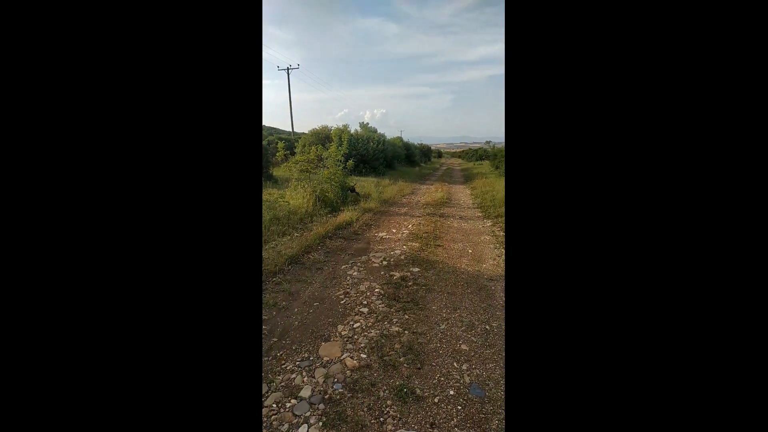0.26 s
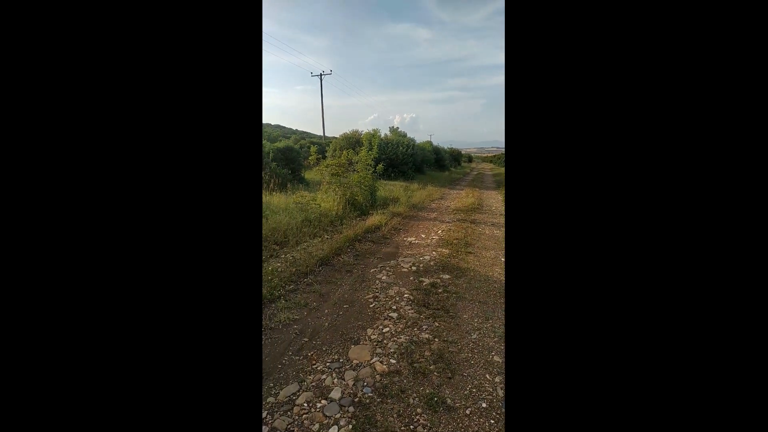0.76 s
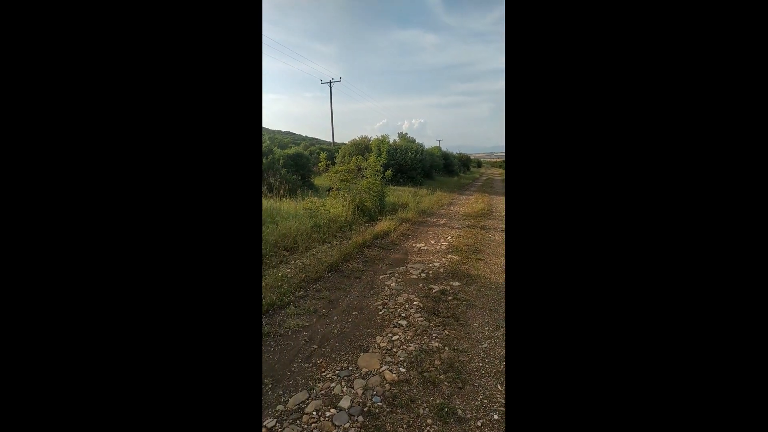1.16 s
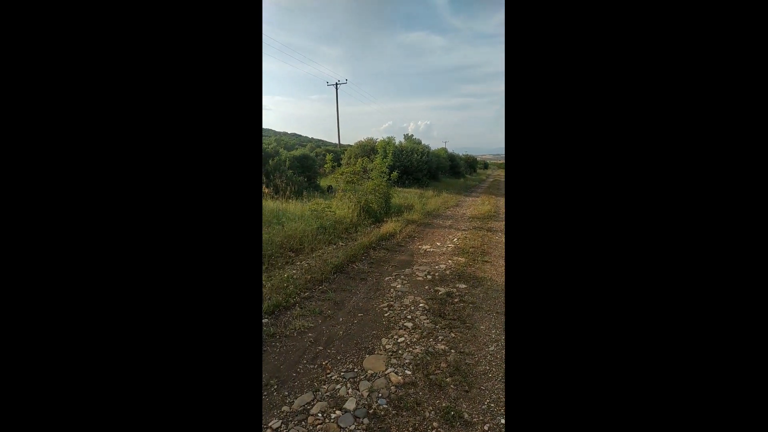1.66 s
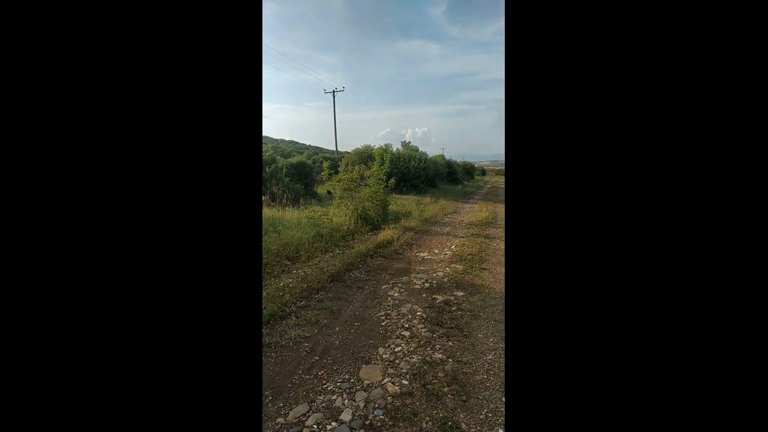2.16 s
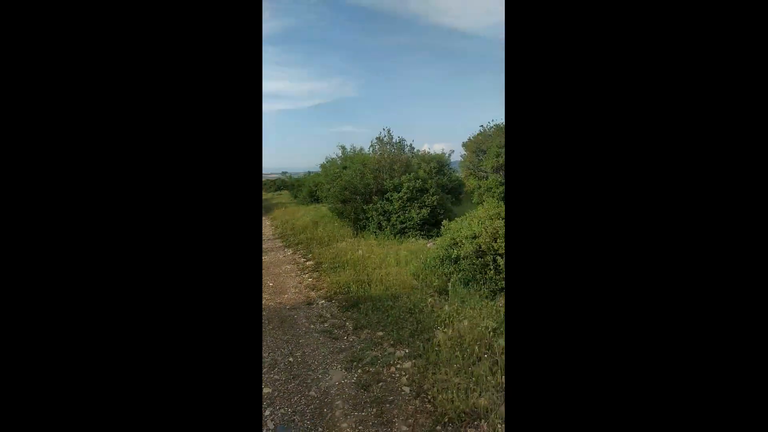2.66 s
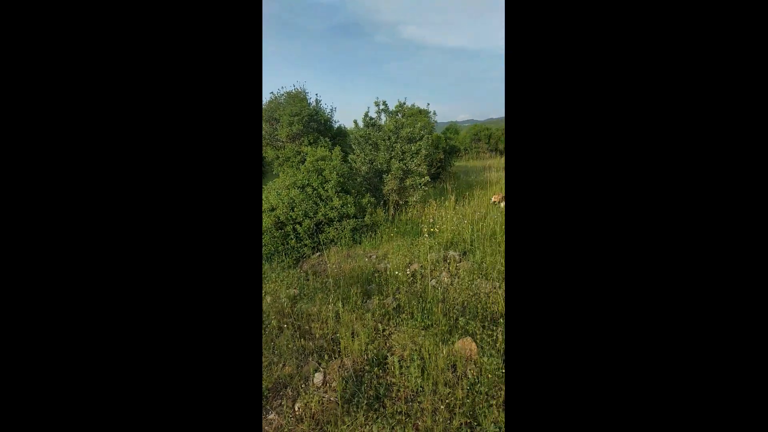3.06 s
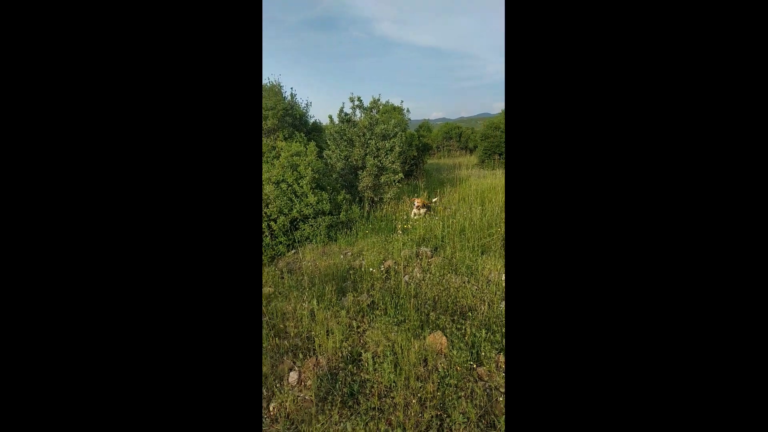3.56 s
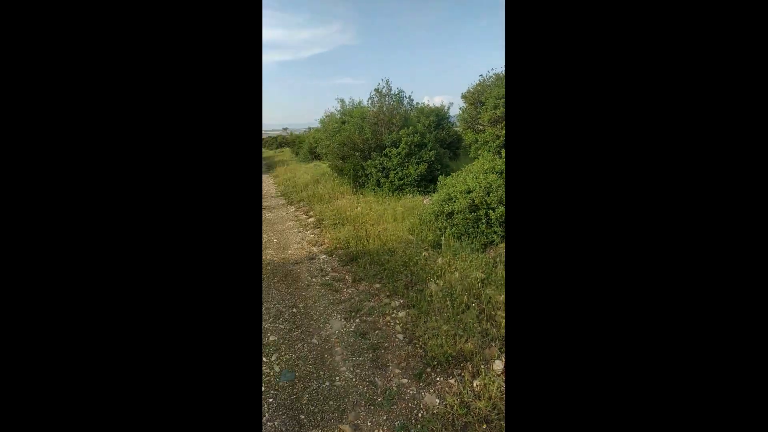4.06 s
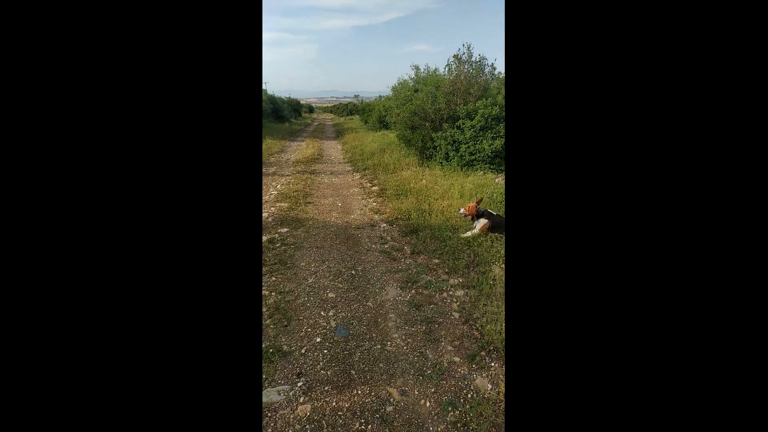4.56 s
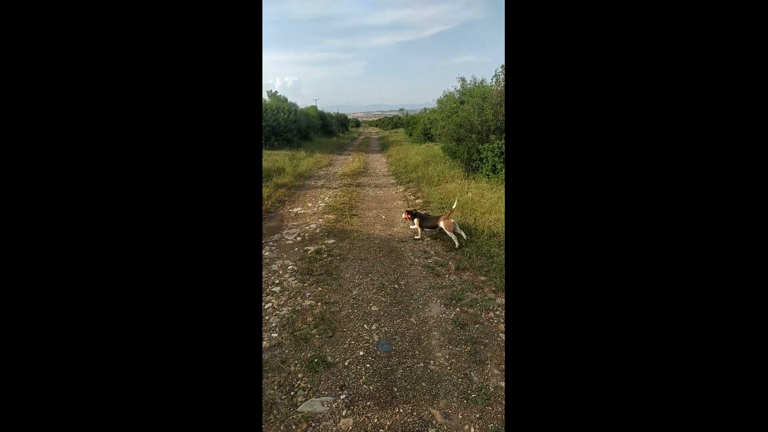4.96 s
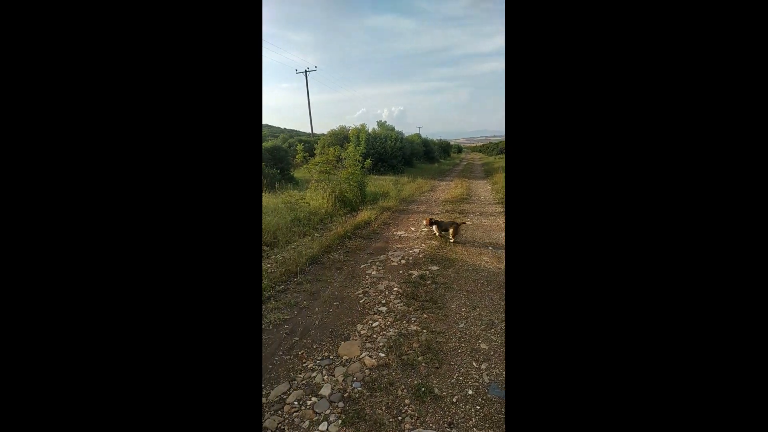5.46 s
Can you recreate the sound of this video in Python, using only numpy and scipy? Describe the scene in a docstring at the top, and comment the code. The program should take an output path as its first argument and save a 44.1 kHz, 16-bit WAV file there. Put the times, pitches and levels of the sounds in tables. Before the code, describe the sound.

A quiet, dry outdoor place: low distant rumble, a faint wash of air and light wind on a handheld stereo microphone. From 0.2 s a collar bell of thin sheet metal ticks and clanks irregularly, very faint, with small dirt scuffs. It strengthens from about 1.3 s. At 1.6 s comes a short, hoarse, high-pitched bark, raspy and moderately distant. Grass swishes and crackles in brief bursts as the bell nears. At 2.8 and 3.15 s two thin, almost pure yelps scoop up and drop, the second cracking. A louder, rough bark hits at 3.77 s, followed by soft paw thuds and the bell's loudest clanks around 3.9-4.2 s, amid a puff of wind. Weak yelps sound at 3.95 and 4.33 s. The bell then jangles on, slightly flatter in pitch as the dog passes, with rustles, scuffs and thuds until 5.7 s. Bushes return a faint dull tail.

```python
"""Two hoarse barks and four thin yelps from a hound working dry scrub, a sheet-metal bell clanking on its collar.
The bell is struck modes that grow louder as the hound nears and end a little flat; the barks are a rough
harmonic voice with rasping air, the yelps near-pure gliding tones.
Shaped noise makes the rustling grass, the scuffs and thuds on dirt, and a faint bed of rumble, wind and air."""
import sys
import numpy as np
from scipy import signal
from scipy.fft import rfft, irfft
from scipy.io import wavfile
from scipy.ndimage import uniform_filter1d

SR = 44100
rng = np.random.default_rng(int(sys.argv[2]) if len(sys.argv) > 2 else 0)


def dump_mix(stems):
    """Bounce the given channels to the path in sys.argv[1] as a 16-bit WAV at rate SR."""
    frames = np.atleast_2d(stems).T  # one column per channel
    limited = np.clip(frames, -1, 1)  # hard clip at full scale
    pcm = np.round(limited * 32767).astype(np.int16)
    wavfile.write(sys.argv[1], SR, pcm)


N = 252252
TIME = np.arange(N) / SR


def gain_of(db):
    """Amplitude factor of a level in dB."""
    return 10 ** (np.asarray(db) / 20)


def evened(x):
    """Scales x to rms 1."""
    return x / np.sqrt(np.mean(x ** 2) + 1e-20)


def read(points, hz):
    """Reads a (frequency [Hz], value) curve, linear over log frequency."""
    f, value = np.transpose(points)
    return np.interp(np.log(hz + 1), np.log(f + 1), value)


def bump(t, at, width):
    """A Gaussian hump of height 1."""
    return np.exp(-((t - at) / width) ** 2)


def ramp(t, start, length):
    """Goes from 0 to 1 over length."""
    return np.clip((t - start) / length, 0, 1)


def add(mix, start_s, sound):
    """Adds sound to mix in place, cut at the end of mix."""
    part = mix[:, max(round(start_s * SR), 0):][:, :sound.shape[-1]]
    part += sound[..., :part.shape[1]]


def coloured(x, spectrum):
    """Filters x by a (frequency [Hz], gain [dB]) curve, then scales it to rms 1."""
    size = x.shape[-1]
    gain = gain_of(read(spectrum, np.fft.rfftfreq(size, 1 / SR)))
    return evened(irfft(rfft(x) * gain, size))


def wander(size, hz):
    """Slow random signal of rms about 1, up to about hz."""
    f = np.fft.rfftfreq(size + SR, 1 / SR)
    noise = rng.standard_normal(size + SR)
    return evened(irfft(rfft(noise) * np.exp(-(f / hz) ** 2)))[:size]


def pair(size, apart):
    """Noise for two ears, partly shared."""
    mid, side = rng.standard_normal((2, size))
    return np.array([mid + apart * side, mid - apart * side])


def bark(length, peak_db, held_hz, clear_s, clear_db, fade_db_per_s, throat):
    """A high voice driven into chaos: the period doubles and stumbles, and air rasps through in puffs."""
    tail_s, attack_s = .06, .022
    clear_hz, clear_width_s = 868, .013  # the voice briefly locks on one pitch
    end_hz, drop_s = 584, .035
    rough_held, rough_clear, rough_end = .64, .15, .5  # 0-1
    jitter, undertone, rasp = .12, .42, .58  # each scaled by roughness below
    sag_db, peak_share = 7.5, .45  # level arch as the lungs empty; crest as a share of the length
    shudder_db, shudder_hz = 2.2, 110
    jaw_hz, jaw_db, jaw_s = 3500, 3, .074  # treble starts jaw_db down and grows as the jaw opens

    t = np.arange(0, length + tail_s, 1 / SR)
    size = len(t)
    clear = bump(t, clear_s, clear_width_s)
    drop = ramp(t, length - drop_s, drop_s)
    hz = held_hz * (1 + .17 * wander(size, 85))
    hz = hz + (clear_hz - hz) * clear + (end_hz - hz) * drop
    rough = rough_held + (rough_clear - rough_held) * clear + (rough_end - rough_held) * drop

    arch = (ramp(t, 0, length) - peak_share) / (1 - peak_share)
    level_db = peak_db + clear_db * clear - sag_db * arch ** 2
    level_db = level_db - fade_db_per_s * np.maximum(t - length, 0)

    turns = np.cumsum(hz * (1 + jitter * rough * wander(size, 390))) / SR
    folds = sum(np.cos(2 * np.pi * k * turns + k * k) / k ** 1.01 for k in range(1, 8))
    halves = sum(np.cos(2 * np.pi * (k - .5) * turns + k * k) / k for k in range(1, 5))
    voice = coloured(folds + undertone * (.5 + rough) * halves, throat)
    puffs = coloured(rng.standard_normal(size) * (1 + .5 * np.cos(np.pi * turns)), throat)
    air_share = rasp * rough ** 2
    sound = np.sqrt(1 - air_share) * voice + np.sqrt(air_share) * puffs
    # lung pressure sets the loudness, whichever resonance the pitch crosses
    sound /= np.sqrt(uniform_filter1d(sound ** 2, size=220) + .05)

    treble = irfft(rfft(sound) * (np.fft.rfftfreq(size, 1 / SR) > jaw_hz), size)
    sound = sound + treble * (gain_of(jaw_db * (ramp(t, 0, jaw_s) - 1)) - 1)
    level = gain_of(level_db + shudder_db * wander(size, shudder_hz))
    return level * ramp(t, 0, attack_s) ** 2 * sound * signal.windows.tukey(size, .03)


def yelp(length, scoop_s, held_hz, crest_hz, base_db, kick_db, swell_db, swell_s, crack_db):
    """A nearly pure whistle: scoops up, flicks to a crest, plunges; quavers when weak, cracks to half pitch."""
    scoop_hz, flick_s, plunge_s, plunge_hz = 793.6, .036, .04, 581
    attack_s, release_s, kick_s = .0071, .015, .015
    swell_rise_s, swell_fall_s, crack_lag_s, crack_s = .036, .021, .033, .018
    mouth_hz, mouth_width_hz, mouth_db = 910, 95, 1.5  # the mouth favours one low pitch
    second_db, throat_hz, undertone_db = -22, 2800, -36

    t = np.arange(0, length, 1 / SR)
    size, crest_s = len(t), length - plunge_s
    hz = scoop_hz + (held_hz - scoop_hz) * ramp(t, 0, scoop_s)
    hz = hz + (crest_hz - held_hz) * ramp(t, crest_s - flick_s, flick_s)
    hz = hz + (plunge_hz - crest_hz) * np.sin(np.pi / 2 * ramp(t, crest_s, plunge_s)) ** 2

    swell_width_s = np.where(t < swell_s, swell_rise_s, swell_fall_s)
    level_db = base_db + kick_db * bump(t, 0, kick_s) + swell_db * bump(t, swell_s, swell_width_s)
    level_db = level_db + mouth_db * bump(hz, mouth_hz, mouth_width_hz)
    weak = np.clip((-20 - level_db) / 20, .1, 1)

    phase = 2 * np.pi * np.cumsum(hz * (1 + .035 * weak * wander(size, 250))) / SR
    # the second harmonic sings out only on the throat resonance
    second = gain_of(second_db) / (1 + ((2 * hz - throat_hz) / 150) ** 2)
    half = gain_of(undertone_db) + gain_of(crack_db) * bump(t, swell_s + crack_lag_s, crack_s)
    tone = np.sin(phase) + second * np.sin(2 * phase) + half * np.sin(phase / 2)
    shimmer = gain_of(1.8 * weak * wander(size, 200))
    edges = ramp(t, 0, attack_s) * ramp(length - t, 0, release_s)
    return np.sqrt(2) * gain_of(level_db) * shimmer * tone * edges


def hound():
    """All calls, with a level and phase difference between the two ports that depends on frequency."""
    # (start [s], length [s], level [dB], pitch [Hz], time until voice clears [s], gain while clear [dB],
    #  final fade [dB/s])
    bark_calls = [(1.589, .14, -27.5, 1004, .062, 1.5, 483), (3.766, .135, -15, 1076, .046, 2.5, 650)]
    # throat colour, one table a bark: (frequency [Hz], gain [dB])
    throat_colours = [
        [(200, -41), (400, -26), (560, -6), (900, -4), (1300, -7.5), (1600, -8), (2300, -1), (2700, -12.5),
         (3100, -21), (3750, -36), (4700, -18), (6000, -22), (9000, -30), (12000, -50)],
        [(200, -32), (470, -32), (630, 2), (900, -7.5), (1300, -4), (1700, -15), (2200, -6.5), (2600, -15.5),
         (3000, -23.5), (3700, -26), (4700, -21), (6500, -23.5), (9000, -29.5), (12000, -37)],
    ]
    # (start [s], length [s], scoop [s], held pitch [Hz], crest pitch [Hz], level [dB], opening kick [dB],
    #  swell [dB], swell time [s], half-pitch crack re voice [dB])
    yelp_calls = [(2.78, 0.16, .035, 1384, 1624, -36.5, 7, 11, .06, -41),
                  (3.142, .158, 0.027, 1272, 1578, -38.5, -13.5, 21, 0.055, -3),
                  (3.948, .157, .031, 1375, 1384, -43, 3.5, 11.5, 0.086, -23.5),
                  (4.332, 0.18, 0.053, 1330, 1630, -44.5, 1.5, 12, 0.081, -25)]

    out = np.zeros((2, N))
    for (start_s, *call), throat in zip(bark_calls, throat_colours):
        add(out, start_s, bark(*call, throat))
    for start_s, *call in yelp_calls:
        add(out, start_s, yelp(*call))
    hz = np.fft.rfftfreq(N, 1 / SR)
    # left minus right; the microphone body shades the left in the middle treble
    balance_db = read([(700, -1), (1280, -1.5), (2300, -3.5), (4400, -11.5), (8000, -5), (14000, 10.0)], hz)
    turn_rad = read([(100, 0), (700, 0.52), (2300, 0.74), (6000, 1)], hz)
    side = np.array([[.5], [-.5]])
    return irfft(rfft(out) * gain_of(side * balance_db) * np.exp(1j * side * turn_rad), N)


def bell():
    """Each blow excites all modes afresh; the clapper then skitters on the wall while the bell turns."""
    # clapper blows: (time [s], strength [dB], hardness = lift of upper modes [dB],
    #  place = shift from the top modes to those near 6 kHz [dB])
    strikes = [(0.155, -67, 8.5, 8), (0.201, -55.5, -0.5, 7.5), (0.376, -57.5, -14.5, 13),
               (0.461, -58, -11, 10), (0.482, -59, -4.5, -2), (0.609, -55, -21, -15),
               (0.674, -49, -4, -3.5), (0.798, -42.5, -14.5, -20), (0.858, -63, 6.5, -1),
               (1.007, -60, -5, -12), (1.053, -60, -5, 4.5), (1.158, -55, -5.5, -4),
               (1.351, -39.5, -2.5, -9.5), (1.408, -65, 7, -6), (1.781, -52, -2.5, -4.5),
               (1.884, -44.5, -30, -10), (1.9, -40.5, -6.5, -8), (1.943, -51.5, 0.5, -1),
               (2.135, -39, -3, 1), (2.241, -49, 2, -0.5), (2.272, -35, -28, -30), (2.296, -45.5, -3, -7),
               (2.419, -52.5, 2, 2), (2.509, -41, -10.5, -4), (2.575, -34.5, -26, -6),
               (2.642, -37, -20.5, -14), (2.691, -50.5, -3, 2), (2.9, -28, -16, -10.5),
               (2.934, -33, -9.5, -3), (3.197, -31, 0.5, -4), (3.248, -41.5, 3, -5),
               (3.304, -55.5, 11.5, -4), (3.384, -45, 2, 7), (3.88, -27, -14, 2), (3.922, -46, 2, 2),
               (3.964, -47.5, 15.5, -4), (4.003, -41, 14.5, 1.5), (4.061, -26, -19, 2),
               (4.073, -23, -19, -31.5), (4.097, -55, 19, 9), (4.174, -25, -8.5, -9), (4.218, -33, 0, -5.5),
               (4.291, -54, -1.5, 24), (4.367, -35.5, -8.5, -4.5), (4.46, -43, -2, 0.5),
               (4.516, -57.5, 1, -37), (4.544, -37, -6.5, -10.5), (4.588, -49, 5.5, 0.5),
               (4.644, -34, -13.5, -11), (4.695, -32, -3, -12), (4.814, -37, -7, -14),
               (4.885, -49.5, 5, -19), (4.954, -37, -33, 2), (5.032, -40.5, -5, -4), (5.141, -35, -15, -17),
               (5.241, -48.5, -20, -2), (5.293, -31.5, -11, -22), (5.301, -39.5, -3.5, -26),
               (5.354, -48, -7.5, 14), (5.384, -59.5, 9, -25), (5.41, -45, 4, -17), (5.435, -35, -21, -19),
               (5.482, -29, -14.5, -29.5), (5.536, -27, -15, -20), (5.584, -33, -18.5, -3),
               (5.604, -40, -12, -16.5), (5.682, -55.5, 4, -10)]
    # modes: (frequency [Hz], level [dB], t60 [s], left minus right [dB])
    modes = [(1274.6, 7.5, 0.095, -5), (1578, -9, 0.72, -4), (3297, -5.5, 0.24, -10),
             (3749, -9.5, 0.9, -15), (4870, -22, 0.26, -36), (6234, -1.5, 0.29, -9),
             (6490, -6.5, 0.28, -30), (7460, -19, 0.088, 6), (9490, -4.5, 0.081, -1.5),
             (9660, -4.5, 0.11, -11), (10940, -7.5, 0.058, -19), (10897, -9, 0.17, 13.5),
             (11120, -30.5, 0.12, -17), (12080, -11, 0.28, 12), (12900, -7, 0.045, 15),
             (14480, -3.5, .14, 13), (15050, -37, 0.099, 6), (13800, -17, 0.35, 9)]
    # the hound's run: (time [s], Doppler factor [ratio], sideways offset scaling the mode panning [0-1.5])
    run = [(0, .988, .5), (.5, .997, .5), (1.8, 1.001, .5), (3.9, 1, .7), (4.35, .994, .8),
           (4.7, .984, 1.1), (5.7, .98, 1.3)]
    # drive of the modes by an ordinary blow: (frequency [Hz], level [dB])
    clapper = [(1300, -2), (1570, -6.5), (3300, -3.5), (3750, -6), (4900, -5), (6400, -0.5), (10500, -1),
               (13600, -5.5)]
    # share of the hardness each mode gets: (frequency [Hz], share [ratio])
    hardness = [(1300, 0), (1570, 1), (3500, 0.41), (6400, 1), (11500, 1)]
    # share of the place each mode gets: (frequency [Hz], share [ratio])
    place = [(1300, 0.0039), (3500, 0.047), (6400, 0.55), (9500, -0.41), (14000, -0.45)]
    # clapper scraping the rim: (frequency [Hz], gain [dB])
    sizzle_colour = [(1500, -9), (5000, -39), (6400, 17), (8400, -21), (9500, 11), (10200, 0), (10900, 5),
                     (12300, -11), (13500, 21), (14400, 6)]
    tick_colour = [(500, -15), (1500, -4), (6000, -2), (14000, 0)]  # (frequency [Hz], gain [dB])
    uneven_db, flutter_db = 1.5, 6.0  # both grow with mode frequency
    chatter, chatter_per_s, skitter_decay_s = .17, 160, .05
    tick_db, tick_decay_s = 2, .0018
    sizzle_db, sizzle_rise_s, sizzle_decay_s = -7.5, .004, .042

    strike_s, strength_db, hard_db, place_db = np.transpose(strikes)
    at = np.clip(np.round(strike_s * SR).astype(int), 0, N - 1)
    run_s, *run_columns = np.transpose(run)
    doppler, aside = (np.interp(TIME, run_s, column) for column in run_columns)
    clock_s = np.cumsum(doppler * (1 + .002 * wander(N, 14))) / SR
    last = np.clip(np.searchsorted(at, np.arange(N), "right") - 1, 0, None)  # latest blow
    age_s = abs(TIME - strike_s[last])
    touches = (rng.random(N) < chatter_per_s / SR) * np.exp(-age_s / skitter_decay_s)

    out, frames = np.zeros((2, N)), np.arange(0, N, 128)
    for hz, mode_db, t60_s, pan_db in modes:
        blow_db = mode_db + strength_db + read(clapper, hz)
        blow_db = blow_db + hard_db * read(hardness, hz) + place_db * read(place, hz)
        touch_gain = chatter * min(hz / 5000, 1.5) * gain_of(blow_db)[last]
        force = touches * touch_gain * rng.standard_normal(N) + 0j
        uneven = uneven_db * hz / 7000 * rng.standard_normal(len(at))
        force[at] = gain_of(blow_db + uneven) * np.exp(2j * np.pi * rng.random(len(at)))
        ring = signal.lfilter([1], [1, -np.exp(-np.log(1000) / (t60_s * SR))], force)
        soft = np.exp(-np.sqrt(hz / 1280) / (SR * .004))  # low modes take longer to speak
        ring = signal.lfilter([1 - soft], [1, -soft], ring) * np.exp(2j * np.pi * hz * clock_s)
        # the sliding clapper loads the wall and blurs the upper modes
        blur_rad = hz / 10000 * evened(uniform_filter1d(rng.standard_normal(len(frames)), size=6))
        for ear, side in enumerate((.5, -.5)):
            # the turning bell beams each mode differently at each port
            drift = evened(uniform_filter1d(rng.standard_normal((2, len(frames))), size=16, axis=1))
            beam_db = side * pan_db * aside[frames] + flutter_db * np.sqrt(hz / 10000) * drift[0]
            beam_rad = blur_rad + drift[1] * np.sqrt(hz / 6400)
            beam = gain_of(beam_db) * np.exp(1j * beam_rad)
            out[ear] += np.sqrt(2) * (ring * np.interp(np.arange(N), frames, beam)).real

    top_db = (strength_db + hard_db - place_db / 2)[last]
    tick = gain_of(top_db + tick_db) * np.exp(-age_s / tick_decay_s) * coloured(pair(N, .5), tick_colour)
    sizzle = gain_of(top_db + sizzle_db + wander(N, 200))
    sizzle = sizzle * np.exp(-age_s / sizzle_decay_s) * (1 - np.exp(-age_s / sizzle_rise_s))
    return out + tick + sizzle * coloured(pair(N, 1), sizzle_colour) * gain_of([[1.5], [-1.5]])


def scrub(x):
    """Bushes scatter back a faint, dull tail: sparse random echoes under a decay."""
    t60_s, rise_s, wet_db = .28, .041, -27
    colour = [(300, -26), (1500, 40.5), (4000, 25.0), (14000, -7)]  # (frequency [Hz], gain [dB])
    t = np.arange(SR) / SR
    taps = rng.standard_normal((2, SR)) * (rng.random((2, SR)) < .05)
    taps = taps * gain_of(-60 * t / t60_s) * (1 - np.exp(-t / rise_s))
    tail = coloured(taps, colour) / np.sqrt(SR)
    return gain_of(wet_db) * signal.fftconvolve(x, tail, axes=1)[:, :N]


def grass():
    """Dry stems brush (smooth noise) and crackle (grainy, wider noise) in short swishes."""
    # (start [s], length [s], level before body_db and fizz_db [dB])
    rustles = [(0.857, .11, -65), (1.201, 0.14, -61), (1.391, 0.094, -65.5), (2.044, 0.097, -54),
               (2.362, 0.13, -57), (2.718, .175, -53.5), (3.126, 0.098, -48), (3.428, .105, -51),
               (3.935, .224, -53.5), (4.315, 0.13, -54), (4.636, 0.18, -54), (5.028, 0.088, -58)]
    # brushing stems: (frequency [Hz], gain [dB])
    swish_colour = [(300, -5), (600, -37), (1300, 9), (1700, 0), (2250, 5), (3000, -2), (5000, -14),
                    (14000, -47)]
    # crackling stems: (frequency [Hz], gain [dB])
    fizz_colour = [(1000, -4), (3000, -1), (4700, 4), (7000, 1.5), (10000, -16), (14000, -68)]
    body_db, fizz_db, grain_db = 2, 1, 3.5
    out = np.zeros((2, N))
    for start_s, length_s, level_db in rustles:
        size = max(round(length_s * SR), 500)
        swish = gain_of(body_db) * coloured(pair(size, 0.098), swish_colour)
        grains = gain_of(grain_db * wander(size, 420))
        crackle = gain_of(fizz_db) * coloured(pair(size, 0.81) * grains, fizz_colour)
        both = swish + crackle * gain_of([[-2], [2]])
        add(out, start_s, gain_of(level_db) * both * np.sqrt(np.hanning(size)))
    return out


def scuffs():
    """Short, dull scrapes on the dirt: noise under smooth humps."""
    # (start [s], level [dB])
    scrapes = [(0.0, -66.5), (.245, -64), (.53, -63), (4.68, -59.5), (5.021, -53.5), (5.37, -56),
               (5.66, -59)]
    # (frequency [Hz], gain [dB])
    scrape_colour = [(150, 2), (350, -17), (580, 3), (850, -18.5), (2000, -70), (8000, -42)]
    half_s = .063 / 2
    rub = sum(gain_of(db) * bump(TIME, start_s + half_s, half_s) for start_s, db in scrapes)
    return rub * coloured(pair(N, 0.13), scrape_colour)


def thuds():
    """Soft, toneless blows on dry earth: low noise under a fast rise and decay."""
    # (time [s], level before lift_db [dB])
    blows = [(0.899, -65), (1.42, -58), (1.731, -51), (2.101, -61), (2.399, -57), (2.972, -50.5),
             (3.058, -56.5), (3.16, -54), (3.908, -44), (4.038, -45), (4.097, -44), (4.135, -52),
             (4.249, -50.5), (4.34, -49.5), (4.417, -56.5), (4.697, -55), (5.313, -53.5), (5.427, -56)]
    # (frequency [Hz], gain [dB])
    earth_colour = [(20, -30), (60, -6.5), (125, 2), (200, -4.5), (350, -10), (600, -23.5), (2000, -10),
                    (8000, -73)]
    rise_s, decay_s, lift_db = .003, .029, 6.5
    push = np.zeros((1, N))
    t = np.arange(SR // 2) / SR
    for blow_s, db in blows:
        add(push, blow_s, gain_of(db) * np.exp(-t / decay_s) * (1 - np.exp(-t / rise_s)))
    return gain_of(lift_db) * push * coloured(pair(N, 0.035), earth_colour)


def background():
    """Distant rumble, light wind that differs at each port, and a slowly swaying wash of air."""
    # gusts on the microphone: (time [s], half-length [s], rise above the breeze [dB])
    gusts = [(2.35, 0.27, 7.8), (2.85, 0.39, 11.3), (4.2, 0.16, 14)]
    # distant rumble: (frequency [Hz], gain [dB])
    rumble_colour = [(20, -11), (45, -14.5), (70, 0.5), (130, -2.5), (230, -8.5), (450, -17.5),
                     (1000, -33.5), (5000, -58)]
    # wind buffeting: (frequency [Hz], gain [dB])
    buffet_colour = [(10, -9), (30, -22.5), (60, -25.5), (150, -37), (1000, -100)]
    # wash of air: (frequency [Hz], gain [dB])
    air_colour = [(100, -6), (300, -4.5), (600, -4.5), (1300, 4), (2200, 0.5), (3200, -2.5), (4500, -0.5),
                  (8000, -6.5), (14000, -4)]
    # wash of air: (time [s], level before air_db [dB])
    air_level = [(0, -72.5), (1.3, -72), (2.4, -65), (3.2, -64.5), (3.7, -63), (4.15, -56), (4.7, -63.5),
                 (5.72, -64.5)]
    rumble_db, lump_db, lump_hz = -65, 1.5, 49
    breeze_db = -62.5
    air_db, sway_db, sway_hz = 9.5, 1.0, 9

    lumps = gain_of(lump_db * wander(N, lump_hz))
    low = gain_of(rumble_db) * coloured(pair(N, 0.087) * lumps, rumble_colour)
    wind_db = breeze_db + sum(db * bump(TIME, gust_s, half_s) for gust_s, half_s, db in gusts)
    buffet = gain_of(wind_db) * coloured(pair(N, 0.61), buffet_colour)
    wash_db = np.interp(TIME, *np.transpose(air_level)) + air_db + sway_db * wander(N, sway_hz)
    wash = gain_of(wash_db) * coloured(pair(N, 0.76), air_colour)
    return low + buffet + wash


def scene():
    """Hound and bell with their scattered tail, over grass, steps and open country."""
    dog = hound() + bell()
    return dog + scrub(dog) + grass() + scuffs() + thuds() + background()


def record(dry):
    """The recorder's band limit: a linear-phase low-pass."""
    edge_hz = 14400
    lowpass = signal.firwin(301, edge_hz, window=("kaiser", 9), fs=SR)
    return signal.oaconvolve(dry, lowpass[None], "same")


dry = scene()
out = record(dry)
dump_mix(out)
```